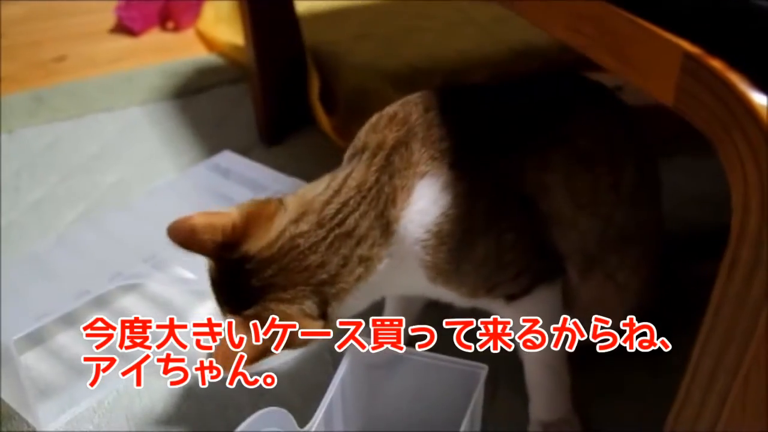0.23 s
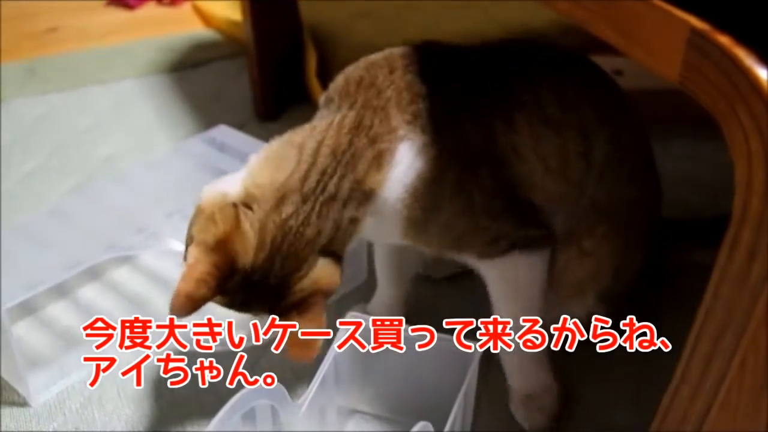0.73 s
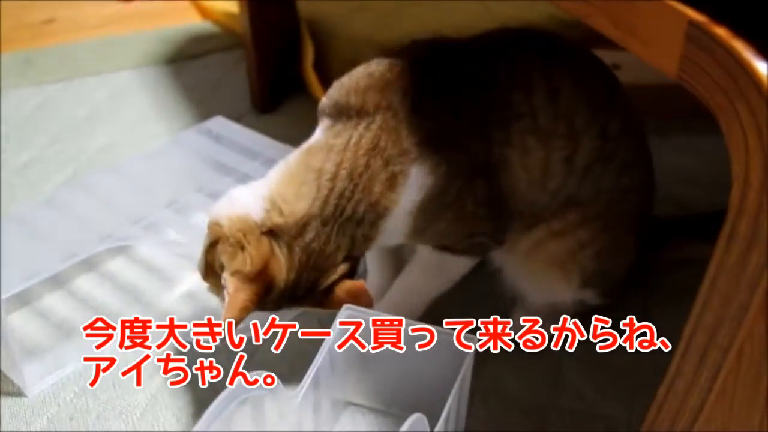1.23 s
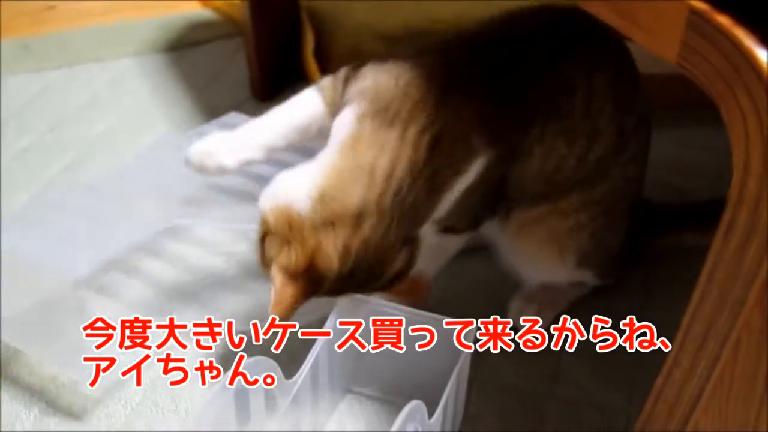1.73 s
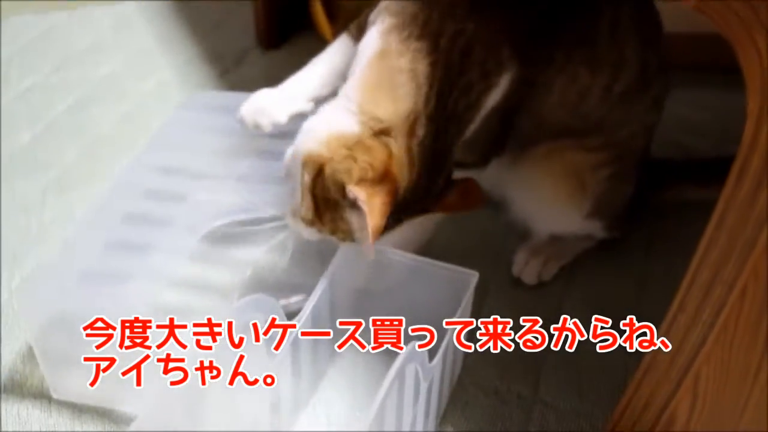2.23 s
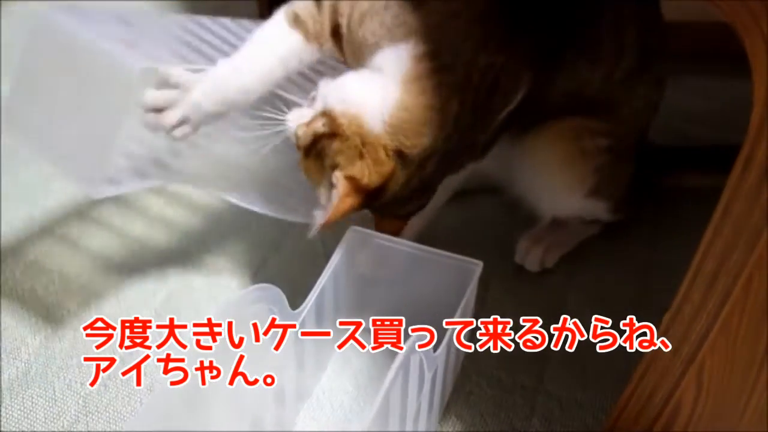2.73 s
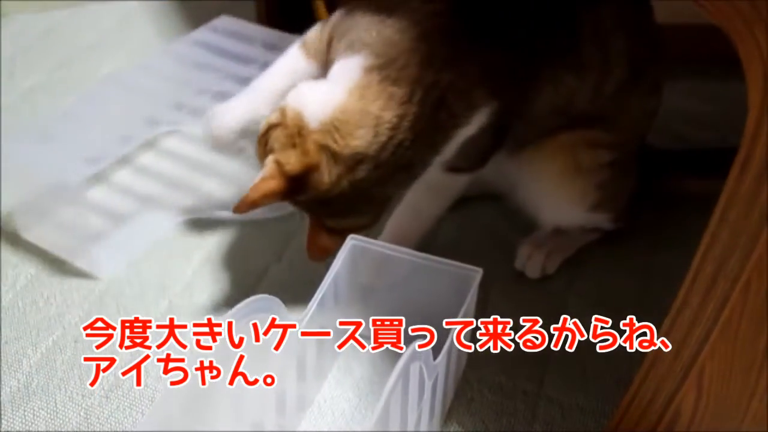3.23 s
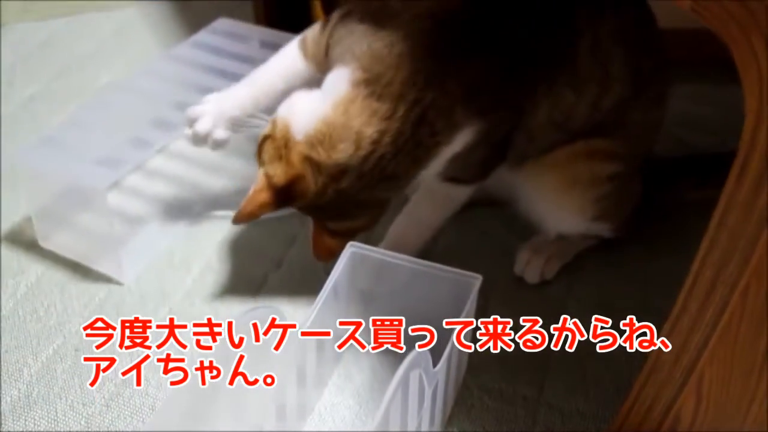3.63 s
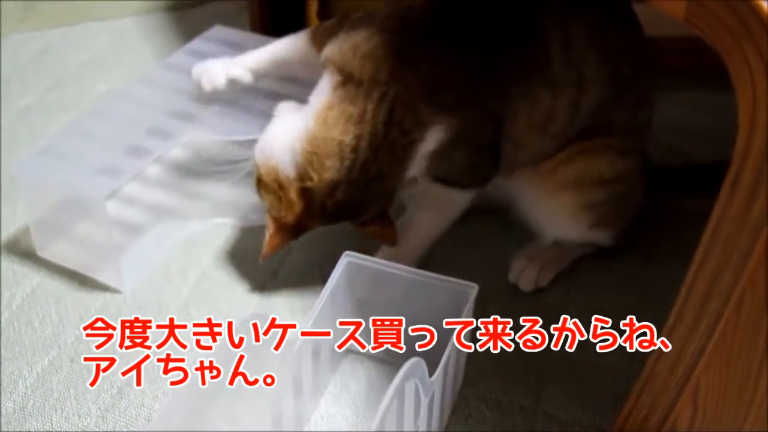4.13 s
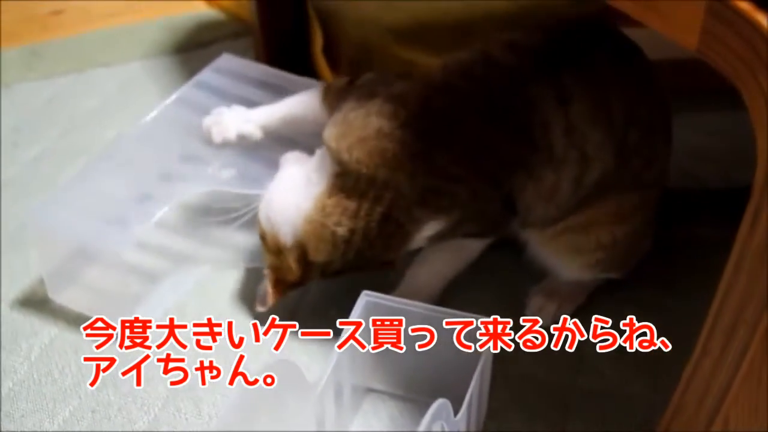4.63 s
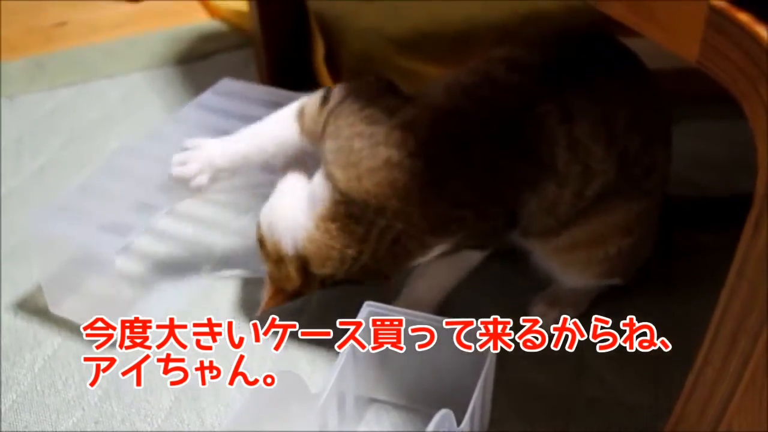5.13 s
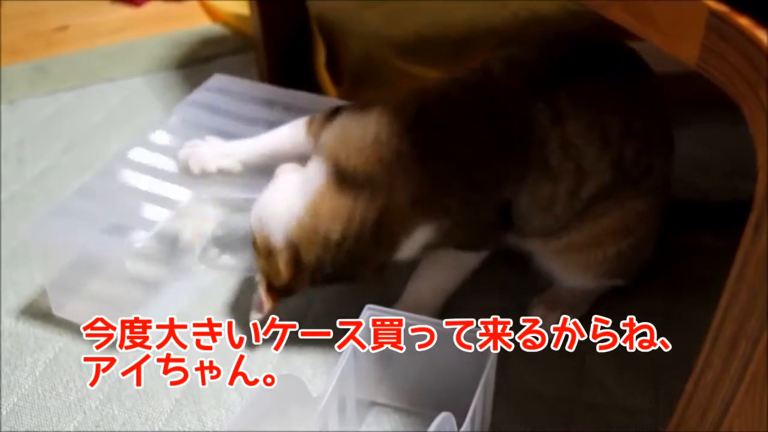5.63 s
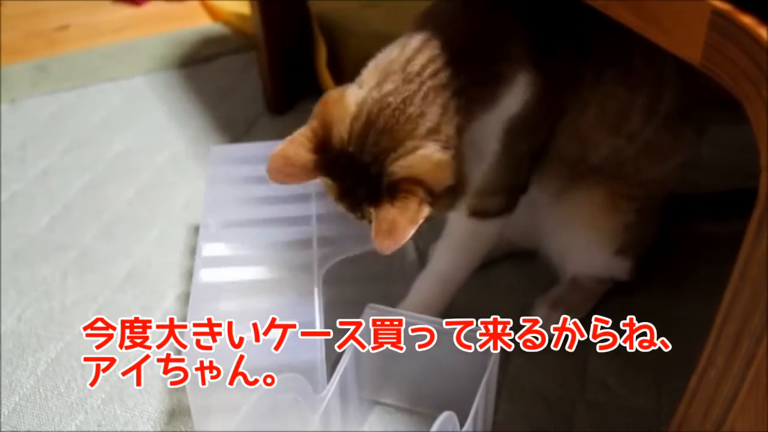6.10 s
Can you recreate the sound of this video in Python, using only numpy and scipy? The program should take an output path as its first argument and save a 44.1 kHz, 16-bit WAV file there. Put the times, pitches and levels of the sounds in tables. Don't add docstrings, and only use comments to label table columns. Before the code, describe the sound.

Close plastic knocking and scraping over wide, quiet hiss: empty cases are pushed, dragged and dropped on a woven mat by a cat. Short hollow cracks, tiny claw ticks and rib pings mix with dull low thumps. Pauses of soft rubbing separate the bursts, the strongest at about three, five and six seconds. The small room gives only a brief tail, with the cases slightly right.

```python
import sys
import numpy as np
from scipy import signal
from scipy.fft import rfft, irfft, next_fast_len
from scipy.io import wavfile

SR = 44100
rng = np.random.default_rng(int(sys.argv[2]) if len(sys.argv) > 2 else 0)


def dump(signal):
    limited = np.clip(np.atleast_2d(signal).T, -1, 1)
    pcm = np.round(limited * 32767).astype(np.int16)
    wavfile.write(sys.argv[1], SR, pcm)


def gain_from_db(level_db):
    decades = np.asarray(level_db, float) / 20
    return 10 ** decades


N = 280631

# frequency in Hz, density in dB per Hz.
HISS_SPECTRUM = [(10, -15), (28, -4), (43, -26), (59, -3), (123, -3), (148, -5), (495, -7.5), (1170, -11.5),
                 (1820, -13.5), (2660, -15), (6890, -22.5), (14000, -31.5), (16000, -43)]
# frequency in Hz, correlation from -1 to 1.
HISS_LIKENESS = [(60, 0.97), (180, -0.3), (550, -0.29), (1650, -0.54), (4970, -0.19), (15000, 0.046)]
# time in seconds, level in dB.
WHINE_LEVEL = [
    (0, -76),
    (.22, -92),
    (.28, -100),
    (.55, -100),
    (.62, -78),
    (2, -78),
    (3.5, -78),
    (5, -76),
    (6.36, -76),
]
# time in seconds, load in dB.
LEANING = [(.7, -79), (.82, -56), (1.22, -62.5), (1.7, -64), (2.15, -58), (2.4, -70.5), (2.88, -55.5),
           (3.2, -55), (3.45, -77), (3.8, -78), (4.1, -50.5), (4.3, -68.5), (4.5, -58.5), (4.9, -62.5),
           (5.14, -62), (5.5, -57.5), (6.04, -52), (6.36, -70)]
# fastest moment in seconds, speeding up in seconds, slowing in seconds,
# scratch level in dB, fizz over the scratch in dB.
STROKES = [(.8, .02, 0.026, -68, -20), (.95, 0.069, .2, -61, -2.5), (1.98, 0.11, 0.11, -58.5, -6),
           (2.3, 0.15, 0.19, -63, -19), (3.07, 0.093, 0.17, -68, 0), (3.3, 0.21, 0.05, -63.5, -2),
           (3.39, 0.017, 0.026, -49, -0.5), (3.646, 0.016, 0.063, -51.5, -5.5),
           (4.001, 0.018, 0.064, -50.5, -20), (4.08, 0.049, 0.034, -72, -6), (4.47, 0.11, 0.064, -58, -3),
           (4.69, 0.079, 0.18, -86, 9), (5.14, 0.36, 0.24, -72, -39), (5.65, 0.26, 0.054, -59, -9),
           (5.85, 0.048, 0.098, -46, -9), (5.95, 0.024, 0.13, -58, 0.5), (6.11, 0.03, 0.089, -58.5, -7),
           (2.96, 0.055, 0.041, -54, -17), (5.055, 0.035, 0.076, -45, -4.5),
           (5.762, 0.077, 0.056, -60, -24), (2.62, 0.072, 0.045, -59, -9)]
# frequency in Hz, density in dB per Hz.
SCRATCH_SPECTRUM = [(400, -12), (700, -1), (1000, 0), (1500, -1), (2100, -3), (3000, -8), (4500, -18),
                    (8000, -36)]
# frequency in Hz, width in Hz, level in dB.
RIB_MODES = [(560, 80, 4), (930, 83, 10), (1250, 80, 2), (1670, 190, 6), (2120, 240, 4), (2880, 350, 5.5)]
# frequency in Hz, density in dB per Hz.
FIZZ_SPECTRUM = [(1500, -62), (3000, -6.5), (4700, -4.5), (6500, -11.5), (9000, -10), (12000, -22),
                 (15000, -42)]
# frequency in Hz, level in dB, decay time t60 in seconds.
WALL_MODES = [(190, -4.5, 0.14), (200, -10, 0.16), (258, -1, 0.28), (292, -10.5, 0.095), (303, 2, 0.1),
              (348.7, 1.5, 0.12), (369, -6, 0.094), (409.7, 0.5, 0.096), (436, 1.5, 0.079), (484, 3, 0.078),
              (509, 2, 0.062), (536, 2.5, 0.067), (581.7, -5, 0.19), (606, -14.5, 0.12), (702, -1, 0.063),
              (713, -6.5, 0.047), (822, -7, 0.03), (1000, -37, 0.053), (1130, -19, 0.02)]
# start in seconds, peak level in dB, loudest mode in Hz,
# lean to high modes in dB per octave, rim crack over the knock in dB.
BLOWS = [(.771, -26.5, 458, -1, -11.5), (.896, -27, 258, 1, -11), (0.945, -26, 426, 2, -4.5),
         (1.03, -18, 270, 6.5, -13.5), (1.58, -25, 226, 6, -32), (1.912, -21.5, 283.5, 0, -16),
         (2.213, -17, 550, 9, -15.5), (2.9384, -19.5, 323, -4, -15), (2.954, -12.5, 498, -17, -11),
         (2.99, -19.5, 415, 4, -10), (3.096, -27.5, 563, -3, -6), (3.642, -26, 530, 23, -7),
         (4.07, -25.5, 420, -6, -17), (4.148, -23.5, 455, -7.5, -15), (4.376, -24, 410, -8, -4.5),
         (4.406, -17, 415, -8, -16), (4.439, -20.5, 430, 9, -8.5), (5.037, -8, 590, 11, -9),
         (5.076, -13.5, 327, 3.5, -8), (5.454, -25.5, 450, -5.5, -17), (5.562, -15, 550, -13, -10),
         (5.635, -23.5, 550, -15, -10.5), (5.968, -17.5, 277, 14.5, -18), (5.978, -10, 370, 5.5, -14.5)]
# start in seconds, peak level in dB, loudest mode in Hz,
# rim crack over the knock in dB.
TAPS = [(1.233, -30, 460, -9), (2.14, -37.5, 485, -23), (2.538, -35.5, 357, -7), (2.59, -39, 594, -14),
        (2.615, -41, 300, 0), (2.915, -29, 467, -10), (3.392, -40.5, 355, -7), (3.626, -31.5, 590, -2),
        (3.848, -37, 560, 3), (3.888, -36.5, 570, -5), (4.009, -36, 454, -20), (4.643, -28.5, 373, -14),
        (5.013, -32.5, 530, -6), (5.29, -43.5, 288, 2.5), (5.922, -32, 304, -11), (5.935, -23.5, 278, -9.5),
        (5.955, -21.5, 290, -28)]
# start in seconds, peak level in dB, loudest mode in Hz.
NUDGES = [(.867, -42, 437), (1.612, -41, 490), (1.649, -34.5, 331), (1.969, -42, 300), (2.079, -41, 524),
          (2.634, -43, 560), (2.738, -43.5, 577), (2.9335, -30, 445), (3.66, -38, 584), (4.046, -27.5, 412),
          (4.276, -38, 484), (4.737, -43, 250), (4.919, -46.5, 252), (5.051, -21, 524), (5.109, -29, 573),
          (5.817, -52, 534), (5.856, -43, 470), (5.999, -23.5, 230), (6.016, -33, 523), (6.132, -33.5, 516),
          (0.799, -34, 480), (.825, -39.5, 480), (4.09, -33.5, 254), (5.042, -11, 606), (2.235, -45, 550),
          (2.252, -37, 540), (2.282, -50, 540), (5.141, -39, 323), (5.96, -23, 298)]
# time in seconds, loss (negative gain) in dB.
MUFFLES = [
    (1.036, -5),
    (2.971, -7),
    (3.668, -6),
    (4.45, -5),
    (5.049, -9),
    (5.986, -4.5),
]
# frequency in Hz, width in Hz, level in dB.
RIM_MODES = [(985, 530, 7.5), (1830, 248, 12), (1899, 218, 12), (2370, 170, 3), (2536, 176, -0.5)]
# frequency in Hz, width in Hz, level in dB.
CLAW_TIP_MODES = [(3010, 1370, 1), (4860, 640, 2.5), (6650, 1800, -3), (9100, 3100, -30)]
# start in seconds, peak level in dB, sharpness in dB.
CLAW_CATCHES = [(1.9348, -38, -19), (2.2142, -45.5, 0), (2.97, -53, -27), (3.093, -43.5, -3.5),
                (3.1974, -46, -15), (3.3835, -46, -5), (3.3989, -47.5, -11), (3.625, -39, -5),
                (3.6427, -45, 3), (3.654, -47, 2), (3.9904, -38, -32), (4.0137, -51, -30),
                (4.562, -47, -15), (4.643, -45, -5), (4.993, -53, -21), (5.0371, -27.5, -6),
                (5.0518, -35, -4.5), (5.48, -42.5, -30), (5.656, -54, -9), (5.952, -33, -12.5),
                (6.0928, -47.5, -9), (6.1257, -54, -16), (0.8977, -46, -6), (1.029, -41, -15),
                (4.1471, -35, -24), (5.633, -37, -41.5)]
# start in seconds, peak level in dB, frequency in Hz,
# decay time t60 in seconds.
PINGS = [(.898, -42, 2000, .02), (0.9464, -42, 1900, .02), (1.033, -41, 2410, .03), (1.233, -48, 2400, .02),
         (2.2135, -40, 2310, 0.033), (2.616, -50, 1510, 0.018), (2.9165, -45, 1950, 0.027),
         (2.9325, -32.5, 1915, 0.033), (2.9896, -34, 1480, .03), (3.092, -32, 1990, 0.027),
         (3.627, -37, 3200, .03), (3.6265, -36, 1780, .025), (3.642, -38, 2000, .025),
         (3.643, -42, 4100, .025), (3.652, -43, 1700, .025), (3.846, -48, 1800, 0.023),
         (3.945, -53, 2560, 0.1), (3.99, -47, 2100, 0.073), (3.989, -46, 1240, .04),
         (4.016, -42, 930, 0.055), (4.072, -44, 890, .05), (4.089, -49, 1200, .02),
         (4.146, -39, 1940, .025), (4.151, -40, 862, 0.081), (4.44, -38, 1570, 0.028),
         (5.016, -48, 1700, .03), (5.0378, -30, 4600, 0.023), (5.038, -23, 950, 0.048),
         (5.0525, -34, 3300, .02), (5.0748, -28, 1080, .05), (5.079, -33, 2410, 0.059),
         (5.098, -35, 960, 0.032), (5.564, -35, 1590, .04), (5.923, -40, 1880, .02),
         (5.9663, -32, 2200, 0.035), (5.967, -40, 3200, .03), (5.977, -30, 1120, 0.032)]
# start in seconds, peak level in dB, frequency in Hz.
THUMPS = [(1.028, -55, 185), (1.579, -30, 139), (1.602, -32, 105), (1.915, -39, 185), (2.808, -38, 110),
          (2.949, -54, 193), (2.954, -17, 115), (3.001, -26, 107), (3.097, -34, 109), (3.132, -30.5, 81),
          (3.16, -27.5, 97), (3.394, -39.5, 117), (3.636, -39, 111), (1.93, -37, 90), (4.046, -35, 184),
          (4.074, -30, 118), (4.439, -43, 158), (4.411, -36, 88), (5.041, -29, 156), (5.078, -22.5, 177),
          (5.099, -34, 166), (5.083, -33, 76.5), (5.455, -43, 190), (5.924, -26, 122), (5.955, -50, 188),
          (5.97, -14.5, 171), (6.008, -21, 134), (6.096, -21, 104.5), (6.12, -21.5, 100), (6.151, -36, 110)]
# frequency in Hz, decay time t60 in seconds.
ROOM_DECAY = [(100, 0.34), (500, 0.27), (2000, 0.13), (6000, 0.33), (12000, 0.057)]

HISS_DB, WHINE_HZ, FAINT_WHINE_HZ = -58, 15279, 11380
WALL_LOAD_DB, MAT_LOAD_DB = -3.2, -1.9
RUB_DB, FUR_DB = -71, -71.5
STROKE_FADE_DB, STROKE_WALL_DB = 12.5, 4
TAP_LEAN_DB, NUDGE_LEAN_DB = 4, -0.5
CONTACT_MS, SHORTER_MS_PER_DB, PAD_MS = 1.42, 0.0646, 0.11
BLOW_DAMPING, TAP_DAMPING, NUDGE_DAMPING = 1.57, 1.19, 1.36
CHATTER_DB, CHATTER_S = 5, 0.00953
MUFFLE_S = 0.0033
RIM_SHARP_DB, RATTLE_DB = -25.5, -18.5
RIGHT_LAG_S = 4e-5
TOP_HZ, CEILING = 15720, .62


def unit(x):
    return x / np.sqrt(np.mean(x ** 2) + 1e-20)


def along(points, hz):
    f, value = np.transpose(points)
    return np.interp(np.log(hz + 1), np.log(f + 1), value)


def curves(rows):
    s, *columns = np.transpose(rows)
    return [np.interp(np.arange(N) / SR, s, column) for column in columns]


def filtered(x, response):
    m = next_fast_len(N + SR // 2)
    spectrum = rfft(x, m) * response(np.fft.rfftfreq(m, 1 / SR))
    return irfft(spectrum, m)[..., :N]


def resonant(modes):
    def response(f):
        total = 0
        for k, (center, width, db) in enumerate(modes):
            loss = 1j * f * width
            total = total + (-1) ** k * gain_from_db(db) * loss / (center * center - f * f + loss)
        return total
    return response


def add(track, s, sound):
    track[round(s * SR):][:len(sound)] += sound


def camera_noise():
    def turn(hz):
        return np.arccos(np.clip(along(HISS_LIKENESS, hz), -1, 1)) / 2

    def mid_side(hz):
        return gain_from_db(along(HISS_SPECTRUM, hz)) * [np.cos(turn(hz)), np.sin(turn(hz))]

    mid, side = filtered(rng.standard_normal((2, N)), mid_side)
    hiss = gain_from_db(HISS_DB) * np.array([mid + side, mid - side]) / np.std(mid)
    t = np.arange(N) / SR
    whine_db, = curves(WHINE_LEVEL)
    whine = np.sqrt(2) * gain_from_db(whine_db) * np.sin(2 * np.pi * WHINE_HZ * t)
    whine = whine + gain_from_db(-90) * np.sin(2 * np.pi * FAINT_WHINE_HZ * t)
    return hiss + whine * gain_from_db([[-4], [3]])


def strokes():
    t, gains = np.arange(N) / SR, np.zeros((2, N))
    for s, up, down, db, fizz_db in STROKES:
        away = np.maximum((s - t) / up, (t - s) / down)
        gains += gain_from_db(db - STROKE_FADE_DB * away) * gain_from_db([[0], [fizz_db]])
    return gains


def slips(per_s, size_db, smooth):
    chance, size = rng.random((2, N))
    slipping = chance < per_s / SR
    grains = slipping * rng.standard_normal(N) * gain_from_db(-size_db * np.log(size + 0.07))
    return unit(grains) + smooth * rng.standard_normal(N)


def touch(ms):
    phase = np.arange(SR // 100) / SR / (np.clip(ms, .5, 6) / 1000)
    return np.sin(np.pi * np.clip(phase, 0, 1)) ** 2


def sliding():
    load_db, = curves(LEANING)
    drag, brush = strokes()
    awake = np.arange(N) / SR > LEANING[0][0]

    pushes = signal.fftconvolve(slips(per_s=260, size_db=4.5, smooth=0.57), touch(ms=0.92))[:N]
    walls = filtered(pushes, resonant([(hz, 3.8 / t60, db) for hz, db, t60 in WALL_MODES]))
    shake = np.hypot(gain_from_db(load_db + WALL_LOAD_DB), gain_from_db(STROKE_WALL_DB) * drag)

    def weave(hz):
        return gain_from_db(along(SCRATCH_SPECTRUM, hz)) * (1 + np.abs(resonant(RIB_MODES)(hz)))

    scratch = filtered(slips(per_s=1100, size_db=-0.5, smooth=1.0), weave)
    fizz = filtered(slips(per_s=2500, size_db=2.0, smooth=1.0), lambda hz: gain_from_db(along(FIZZ_SPECTRUM, hz)))
    surface = np.hypot(drag, gain_from_db(RUB_DB) * awake) * unit(scratch)
    surface = surface + np.hypot(brush, gain_from_db(FUR_DB) * awake) * unit(fizz)

    mat = filtered(rng.standard_normal(N), lambda hz: resonant([(110, 90, 0)])(hz) ** 2)
    return shake * unit(walls) + surface + gain_from_db(load_db + MAT_LOAD_DB) * unit(mat)


def contacts():
    blows = [(*row, BLOW_DAMPING, 0) for row in BLOWS]
    taps = [(s, db, hz, TAP_LEAN_DB, crack, TAP_DAMPING, 0) for s, db, hz, crack in TAPS]
    nudges = [(*row, NUDGE_LEAN_DB, None, NUDGE_DAMPING, PAD_MS) for row in NUDGES]
    return blows + taps + nudges


def muffled(ring, s):
    now = s + np.arange(len(ring)) / SR
    gain_db = np.zeros(len(ring))
    for caught, db in MUFFLES:
        if caught > s + MUFFLE_S:
            gain_db += db * np.clip((now - caught) / MUFFLE_S, 0, 1)
    return ring * gain_from_db(gain_db)


def knocks(spread_db=2.5, focus_db=9, focus_oct=0.12, far_db=6, rise=0.0022, first_t60=0.036, first_db=4):
    body, t = np.zeros(N + SR), np.arange(SR // 5) / SR
    hz, level_db, t60 = np.transpose(WALL_MODES)[:, :, None]
    blend = np.clip(1 - np.abs(t / CHATTER_S - np.arange(1, 25)[:, None]), 0, 1)
    for s, db, near_hz, lean_db, _, damping, pad_ms in contacts():
        scatter, detune = rng.standard_normal((2, len(WALL_MODES), 1))
        contact_ms = CONTACT_MS + pad_ms - SHORTER_MS_PER_DB * (db + 19.0)
        octaves = np.log2(hz / near_hz)
        reach_db = lean_db * octaves + focus_db * np.exp(-(octaves / focus_oct) ** 2) - far_db * octaves ** 2
        fade = gain_from_db(-60 * t * np.clip(damping, .3, 4) / t60) + gain_from_db(first_db - 60 * t / first_t60)
        chatter_db = CHATTER_DB * rng.standard_normal((len(WALL_MODES), len(blend))) @ blend
        swing = np.cos(2 * np.pi * hz * (1 + 0.036 * detune) * t)
        speed = gain_from_db(level_db + reach_db + spread_db * scatter + chatter_db) * fade * swing
        ring = signal.fftconvolve(speed.sum(axis=0) * (1 - np.exp(-t / rise)), touch(contact_ms))
        ring = signal.lfilter(*signal.butter(3, near_hz * 0.53, "high", fs=SR), ring)
        add(body, s, gain_from_db(db) * muffled(ring / np.abs(ring).max(), s))
    return body[:N]


def clicks(click_t60=0.01, rattle_t60=0.18, rise=0.00044):
    rim, tip, t = np.zeros(N + SR), np.zeros(N + SR), np.arange(SR // 5) / SR
    cracks = [(s, db + crack_db, RIM_SHARP_DB)
              for s, db, _, _, crack_db, *_ in contacts() if crack_db is not None]
    for s, db, sharp_db in cracks + CLAW_CATCHES:
        crack = gain_from_db(db - 60 * t / click_t60) + gain_from_db(db + RATTLE_DB - 60 * t / rattle_t60)
        crack = crack * (1 - np.exp(-t / rise))
        uneven = gain_from_db(2.3 * rng.standard_normal(len(t) // 60 + 1)).repeat(60)[:len(t)]
        rough = rng.standard_normal((2, len(t))) * uneven
        add(rim, s, gain_from_db(5.5) * crack * rough[0])
        add(tip, s, gain_from_db(sharp_db + 19.0) * crack * rough[1])
    rim_sound = filtered(rim[:N], lambda f: resonant(RIM_MODES)(f) / (1 + 1j * f / 5000))
    tip_sound = filtered(tip[:N], lambda f: resonant(CLAW_TIP_MODES)(f) / (1 + 1j * f / 10000) ** 2)
    return rim_sound + tip_sound


def pings(rise=0.00063, pair=1.045, pair_db=-5):
    ribs, t = np.zeros(N + SR), np.arange(SR // 8) / SR
    for s, db, hz, t60 in PINGS:
        swing = np.sin(2 * np.pi * hz * t) + gain_from_db(pair_db) * np.sin(2 * np.pi * hz * pair * t)
        add(ribs, s, gain_from_db(db - 2.5 - 60 * t / t60) * (1 - np.exp(-t / rise)) * swing)
    return ribs[:N]


def thumps(t60=0.088, rise=0.0018):
    floor, t = np.zeros(N + SR), np.arange(SR // 4) / SR
    for s, db, hz in THUMPS:
        envelope = gain_from_db(db - 0.5 - 60 * t / t60) * (1 - np.exp(-t / rise)) ** 2
        add(floor, s, envelope * np.sin(2 * np.pi * hz * t))
    return floor[:N]


def room(x, gap=0.0036):
    out, step = np.zeros((2, N + SR)), SR // 3
    for start in range(0, N, step):
        hz, t, z = signal.stft(rng.standard_normal((2, SR // 2)), SR, nperseg=256)
        decay = gain_from_db(-60 * t / along(ROOM_DECAY, hz)[:, None])
        tail = signal.istft(z * decay, SR, nperseg=256)[1]
        tail = tail / np.linalg.norm(tail[0])
        wet = signal.fftconvolve(x[None, start:start + step], tail, axes=1)
        add(out.T, start / SR + gap, wet.T)
    return out[:, :N]


def scene():
    cases = sliding() + knocks() + clicks() + pings() + thumps()
    echo = room(cases)
    alike_db = [(200, -17.5), (1000, -8.5), (5000, -10.5)]  # (Hz, dB)
    apart_db = [(200, -26.0), (1000, -28.0), (5000, -21)]
    common, apart = filtered(echo, lambda hz: gain_from_db([along(alike_db, hz), along(apart_db, hz)]))
    lag_s = RIGHT_LAG_S * np.array([[0], [1]])
    near = filtered(cases + common, lambda hz: np.exp(-2j * np.pi * hz * lag_s))
    return near * gain_from_db([[-1.4], [1.4]]) + apart * [[1], [-1]] + camera_noise()


def top_cut(x):
    return signal.sosfilt(signal.butter(12, 15880, fs=SR, output="sos"), x)


def record(dry):
    heard = filtered(dry, lambda hz: 1j * hz / (30 + 1j * hz) * (hz < TOP_HZ))
    mix = heard / (1 + np.abs(heard / CEILING) ** 4) ** 0.27
    return top_cut(mix)


dry = scene()
out = record(dry)
dump(out)
```